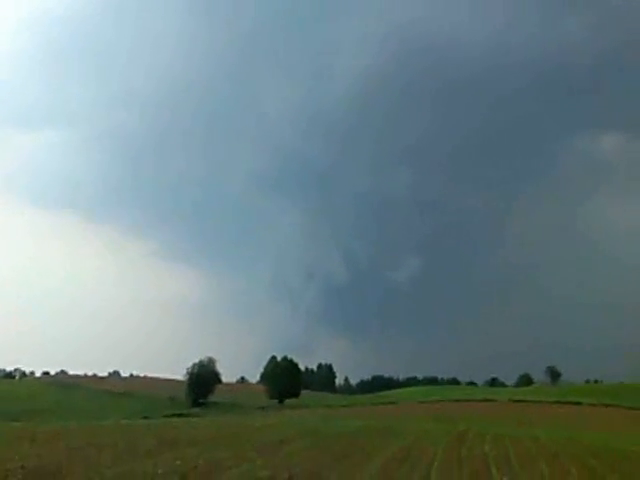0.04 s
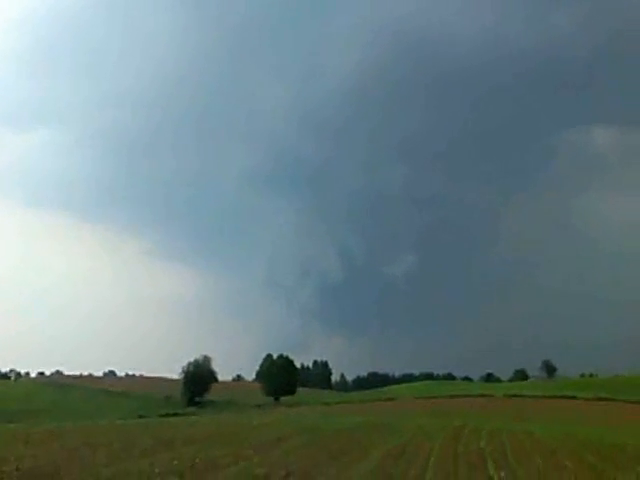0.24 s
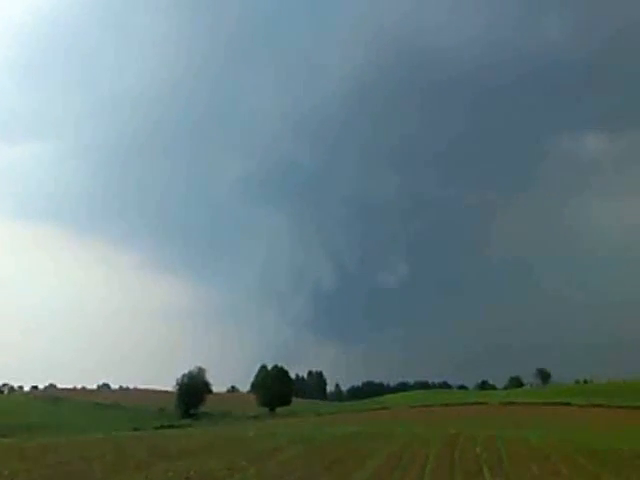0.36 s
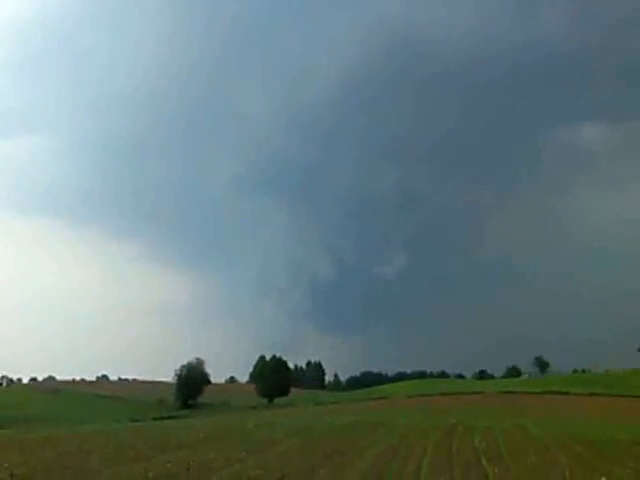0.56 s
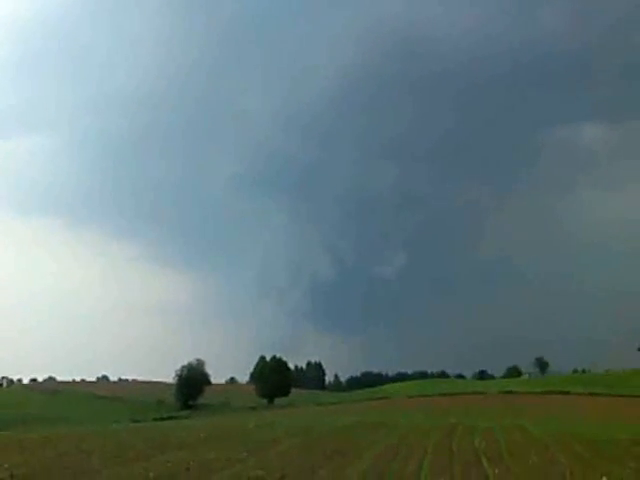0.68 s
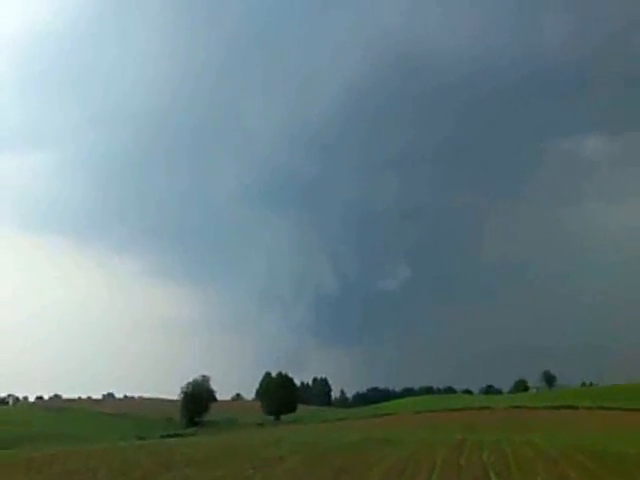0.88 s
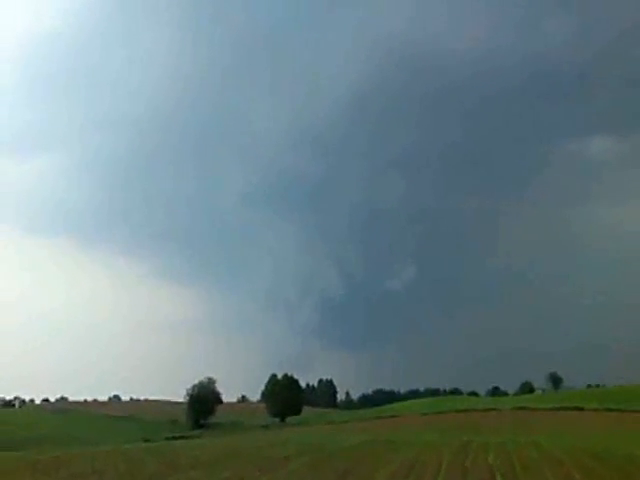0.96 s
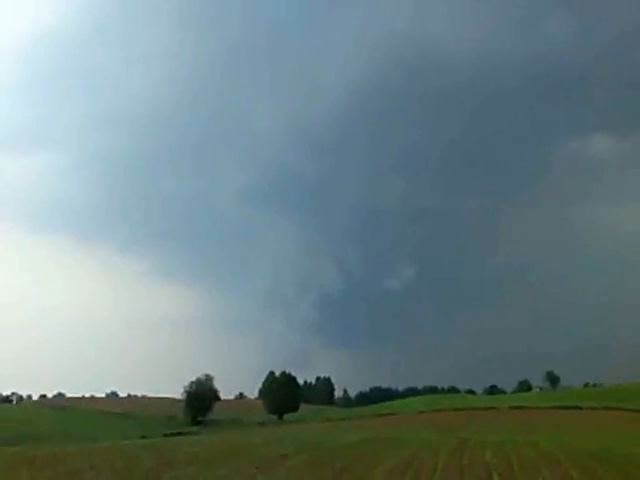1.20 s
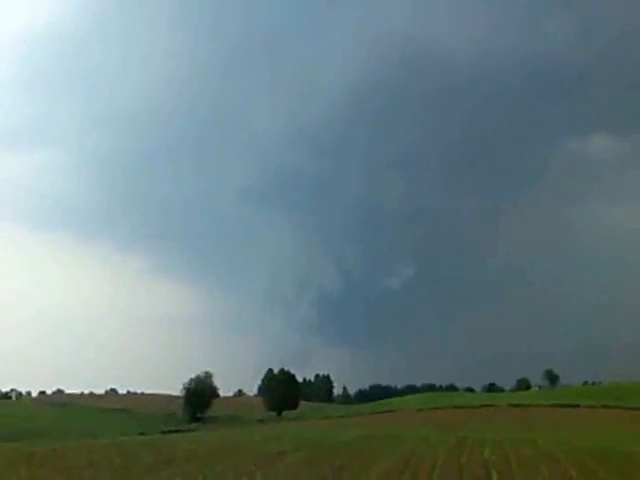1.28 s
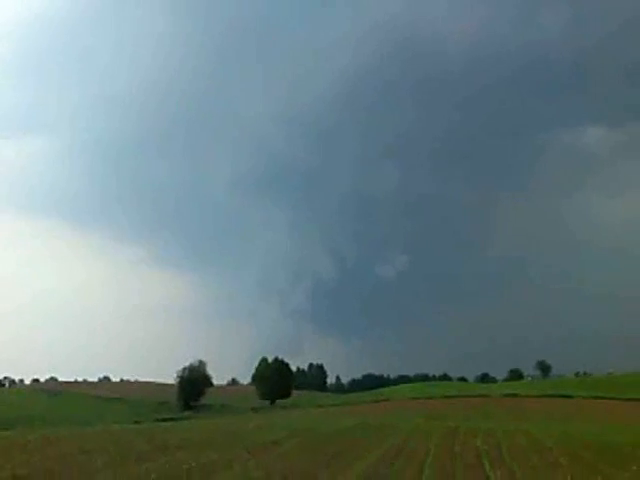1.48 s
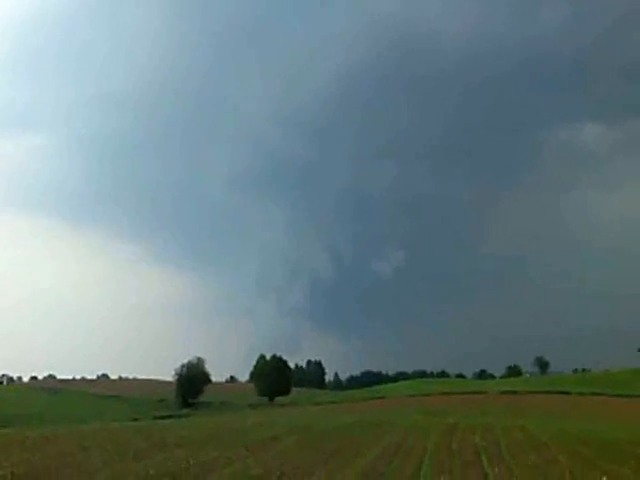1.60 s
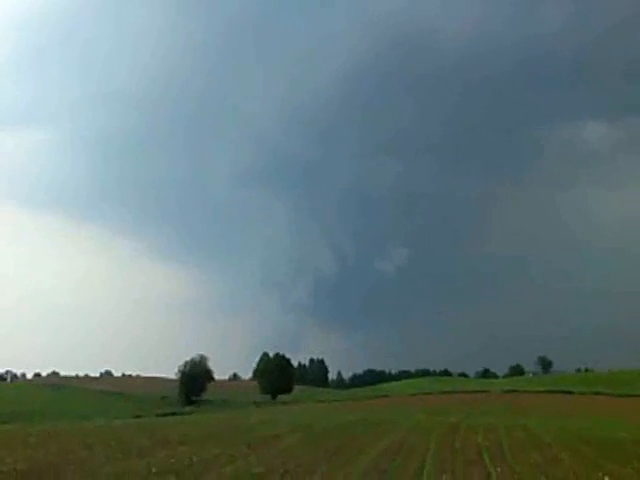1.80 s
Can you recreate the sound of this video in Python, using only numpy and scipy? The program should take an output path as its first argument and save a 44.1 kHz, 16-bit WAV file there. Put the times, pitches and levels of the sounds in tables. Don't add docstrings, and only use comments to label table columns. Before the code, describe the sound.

After a moment of soft hiss, a faint far bird and low thuds, thunder slams in with dense overlapping bangs, distorting a small outdoor microphone, weakens briefly, swells again and rolls off dull and low.

```python
import sys
import numpy as np
from scipy import signal
from scipy.fft import rfft, irfft, next_fast_len
from scipy.io import wavfile
from scipy.ndimage import uniform_filter1d

SR = 44100
rng = np.random.default_rng(int(sys.argv[2]) if len(sys.argv) > 2 else 0)


def file_out(sig):
    cols = np.atleast_2d(sig).T
    lim = np.clip(cols, -1, 1)
    pcm = np.round(lim * 32767).astype(np.int16)
    wavfile.write(sys.argv[1], SR, pcm)


def linear_from_db(decibels):
    return 10 ** (np.asarray(decibels, float) / 20)


N = 81585

KNEE_HZ = 410
PACKET_SPREAD = 0.4


def unit(x):
    return x / np.sqrt(np.mean(x ** 2))


def colour(x, table):
    size = next_fast_len(N + 8192)
    hz = np.maximum(np.arange(size // 2 + 1) * SR / size, 1)
    table_hz, table_db = np.array(table, float).T
    gain = linear_from_db(np.interp(np.log(hz), np.log(table_hz), table_db))
    return irfft(rfft(x, size) * gain, size)[:N]


def walk(rate):
    hold = int(SR / rate)
    steps = np.repeat(rng.standard_normal(N // hold + 1), hold)
    return 1.3 * uniform_filter1d(uniform_filter1d(steps, hold), hold)[:N]


def split(x, hz):
    low = signal.sosfiltfilt(signal.butter(2, hz, fs=SR, output="sos"), x)
    return low, x - low


def packet(t, s, hz, cycles):
    return np.exp(-0.5 * ((t - s) * hz / (cycles * PACKET_SPREAD)) ** 2)


def scatter(x):
    decay_s, share = 0.02, 0.6
    lag = np.arange(int(6 * decay_s * SR)) / SR
    echoes = share * rng.standard_normal(len(lag)) * np.exp(-lag / decay_s)
    echoes = echoes / np.sqrt(decay_s * SR * share)
    return x + signal.fftconvolve(x, echoes)[:N]


# (frequency [Hz], level [dB])
SHOCK_SPECTRUM = [(20, -65.5), (48, -29), (85, -4.5), (242, 0.5), (400, -5.5), (500, -14), (800, -16),
                  (2190, -46), (4200, -65.5), (6000, -88)]
# (time [s], level [dB], brightness above the knee [dB per octave], weight of the deep part [dB])
ROLL_COURSE = [(0, -41.5, 0, 10.5), (.11, -46.5, 2.5, 24), (0.189, -42, 4, 12.5), (0.207, -32.5, 9, 14),
               (.3, -11, 2.5, 2.5), (.38, -7.5, 0.5, 7.5), (.54, -10.5, 3.5, 6.5), (.63, -11, 1, 0.5),
               (.69, -17, 2.5, 4.5), (0.799, -17.5, 0, 7.5), (0.813, -11.5, 3, 8.5), (0.888, -10, 2.5, -1),
               (.96, -10, 3.5, 1), (1.03, -12.5, 2.5, -1.5), (1.12, -13, -3, -3), (1.35, -23, -0.5, 7.5),
               (1.6, -29, 2, 7.5), (1.85, -32.5, 2.5, 6.5)]


def roll(t):
    shocks_per_s, size_spread_db = 1500, 1.8
    deep_hz = 147
    s, db, bright, deep = np.array(ROLL_COURSE, float).T
    arrives = rng.random(N) < shocks_per_s / SR
    sign = rng.choice([-1, 1], N)
    size = linear_from_db(size_spread_db * np.minimum(rng.exponential(size=N), 3))
    shocks = unit(colour(scatter(arrives * sign * size), SHOCK_SPECTRUM))
    low, rest = split(shocks, deep_hz)
    mid, high = split(rest, KNEE_HZ)
    upper, top = split(high, 2 * KNEE_HZ)
    tilt = linear_from_db(np.interp(t, s, bright))
    body = low * linear_from_db(np.interp(t, s, deep)) + mid + upper * tilt + top * tilt ** 2
    gusts_db = -0.5 * walk(31.31)
    return body * linear_from_db(np.interp(t, s, db) - 1.5 + gusts_db)


# (time [s], peak level [dB], pitch [Hz], length [cycles])
LOUD_CLAPS = [(0.298, -11, 131.7, 9.3), (0.342, -2, 423, 4.6), (0.342, -6.5, 180.2, 8),
              (0.377, 3, 315.4, 2.9), (0.385, -1, 142.6, 3.1), (0.396, 4.2, 203, 2.2), (0.414, 1, 294, 2.6),
              (0.432, 3.5, 131.5, 1.1), (0.445, 2.3, 205.3, 1.8), (0.461, 2.5, 137.2, 2.2),
              (0.495, 1.1, 312, 4.8), (0.511, -2, 95, 1.7), (0.517, -1.5, 254, 1.2), (0.556, -3, 247, 0.93),
              (0.584, -1.5, 157.5, 3.6), (0.62, -8.5, 225, 1.3), (0.642, -3, 307, 2.7),
              (0.821, -7.5, 349, 7.4), (0.847, -9, 304, 9), (0.912, 0.3, 284, 1.6), (0.932, 2.4, 232, 1.5),
              (0.99, -7.5, 297, 7.6), (0.99, -10, 234.5, 7.8), (1.014, -3, 293, 8.5),
              (1.072, -2.5, 225, 1.7), (1.134, -8.5, 221.5, 5.8), (1.166, -9, 186, 2.14),
              (1.292, -12.5, 174, 2.7)]
# (time [s], peak level [dB], pitch [Hz], length [cycles])
MORE_CLAPS = [(0.018, -29.5, 80.5, 1.3), (.112, -23, 133, 1.1), (.205, -18.5, 338, 2.6),
              (.215, -17.5, 149, 3.6), (0.339, 0, 330, 1.9), (.351, -5, 200, 1.2), (0.366, -1, 253, 1.1),
              (.409, 2.5, 338, 2.0), (0.493, 1, 324.6, 1.65), (.246, -6, 392, 2.9), (.279, -8, 300, 3.8),
              (0.532, -0.5, 280, 1.7), (0.973, -2, 238, 2.35), (.44, 0, 279.4, 1.1),
              (0.504, -2.5, 284.6, 0.79), (.595, -1.5, 252.6, 0.98), (.622, -3, 297, 1.9),
              (0.697, -7, 500, 0.67), (0.994, -2, 275, 1.4), (0.582, -3, 200, 1.9), (.93, 0, 250, 1.4),
              (1.007, 2.0, 269, 0.75), (1.014, -1.6, 226.6, 0.93), (1.022, -5.5, 230, 0.78),
              (.76, -11, 194.6, 2.2), (1.457, -13, 184, 1.5), (1.518, -20, 105, 1.1),
              (1.556, -17.5, 102, 1.6)]


def claps(t, table):
    level_db, crackle_db = -0.97, -16.5
    noise = colour(rng.standard_normal(N), SHOCK_SPECTRUM)
    crackle = linear_from_db(crackle_db) * unit(split(noise, KNEE_HZ)[1])
    out = np.zeros(N)
    for (s, db, hz, cycles), phase in zip(table, rng.random(len(table))):
        swing = np.sin(2 * np.pi * (hz * (t - s) + phase))
        out += linear_from_db(db + level_db) * packet(t, s, hz, cycles) * (swing + crackle)
    return out


# (time [s], peak level [dB], pitch [Hz], length [cycles])
BIRD_CHIRPS = [
    (0.214, -46.5, 3700, 14),
    (.214, -57, 4400, 14),
    (0.243, -45.5, 3380, 26),
    (0.257, -38, 1960, 22),
]


def bird(t):
    pitch_hz, sag_hz_per_s, breath_width_hz = 2095, 420, 70
    level_db, fade_db_per_s = -48.5, 50
    wave = np.exp(2j * np.pi * np.cumsum(pitch_hz - sag_hz_per_s * t) / SR)
    flutter = 1 + walk(2 * breath_width_hz) + 1j * walk(2 * breath_width_hz)
    note = (wave * flutter).real * linear_from_db(level_db - fade_db_per_s * t)
    for s, db, hz, cycles in BIRD_CHIRPS:
        note = note + linear_from_db(db) * packet(t, s, hz, cycles) * np.sin(2 * np.pi * hz * t)
    return note


# (frequency [Hz], level [dB per Hz])
FIELD_SPECTRUM = [(900, -9), (1270, -6.5), (3500, -11.5), (4300, -23), (4900, -35), (7500, -40.5),
                  (11000, -31), (12500, -36.5)]


def field():
    spectrum = [(300, -36.5)] + list(FIELD_SPECTRUM) + [(13000, -74.5)]
    return unit(colour(rng.standard_normal(N), spectrum)) * linear_from_db(-51.5 + 1.0 * walk(14))


# (frequency [Hz], rms level [dB])
CLOCK_TONES = [(5512, -88), (6891, -84), (8269, -79), (9647, -83), (11025, -68), (12403, -82)]


def clock_whine(t):
    return sum(np.sqrt(2) * linear_from_db(db) * np.sin(2 * np.pi * hz * t) for hz, db in CLOCK_TONES)


def short_power(x):
    return uniform_filter1d(x ** 2, int(0.008 * SR)) + 1e-12


def scene():
    t = np.arange(N) / SR
    body = roll(t)
    loud = claps(t, LOUD_CLAPS) + claps(t, MORE_CLAPS)
    clap_share = short_power(loud) / (short_power(loud) + short_power(body))
    thunder = body * linear_from_db(-8.0 * clap_share) + loud
    return (thunder + bird(t) + field())[None]


def low_pass(x):
    return signal.sosfilt(signal.butter(12, 15700, fs=SR, output="sos"), x)


def record(dry):
    t = np.arange(N) / SR
    clip = 0.897
    flat = np.clip(dry + clock_whine(t), -clip, clip)
    return low_pass(flat)


dry = scene()
out = record(dry)
file_out(out)
```